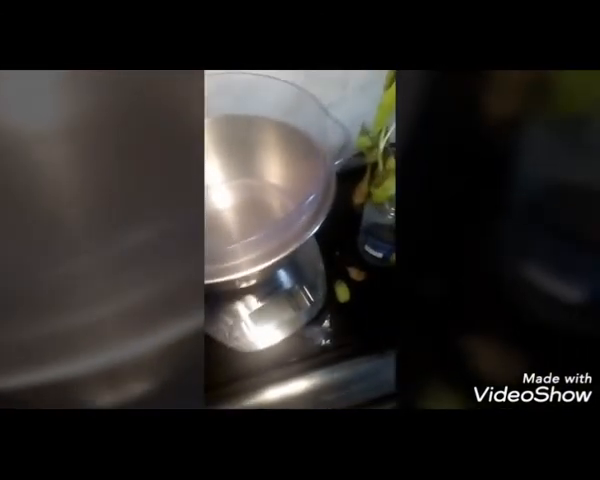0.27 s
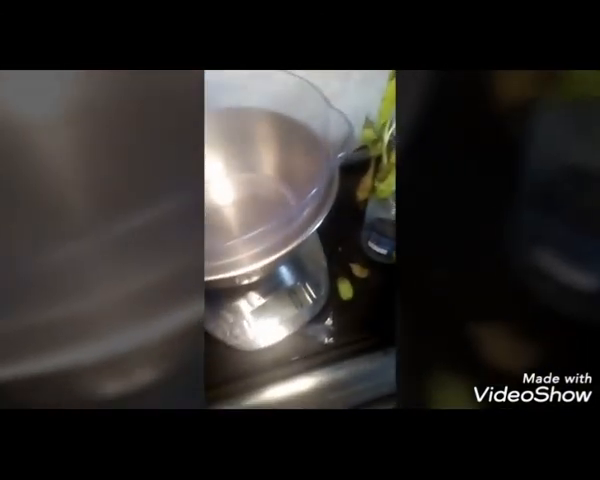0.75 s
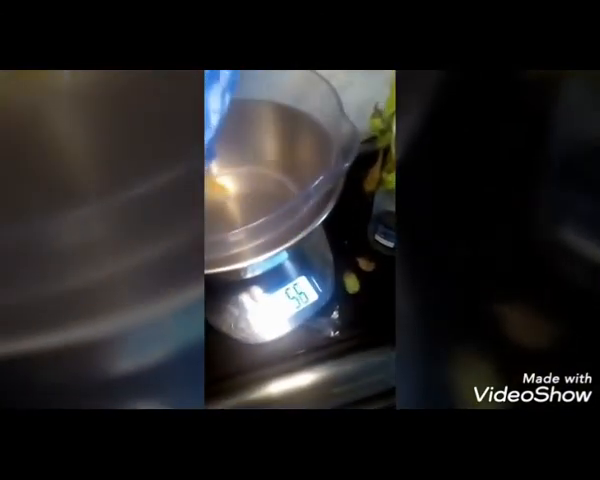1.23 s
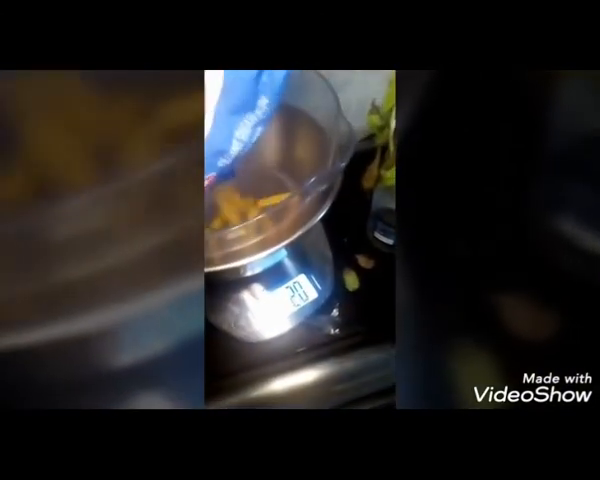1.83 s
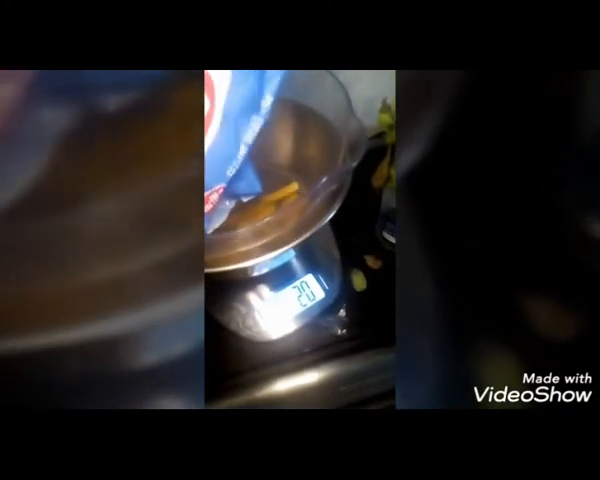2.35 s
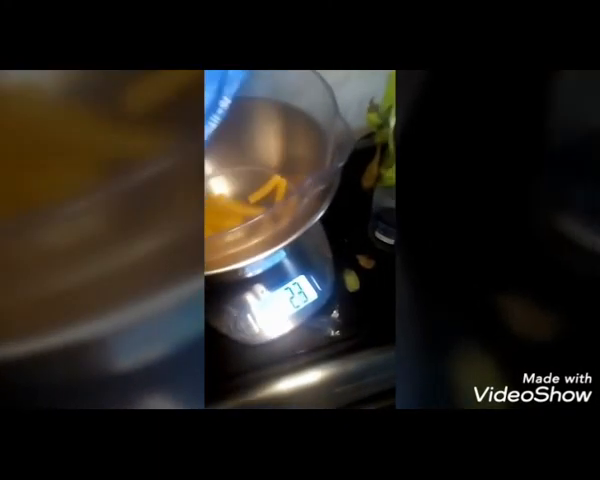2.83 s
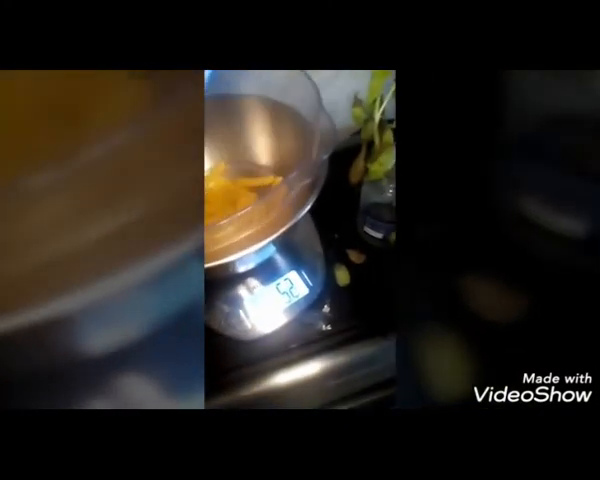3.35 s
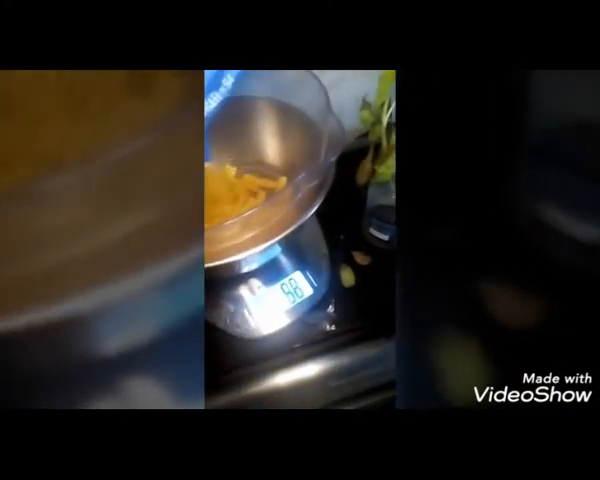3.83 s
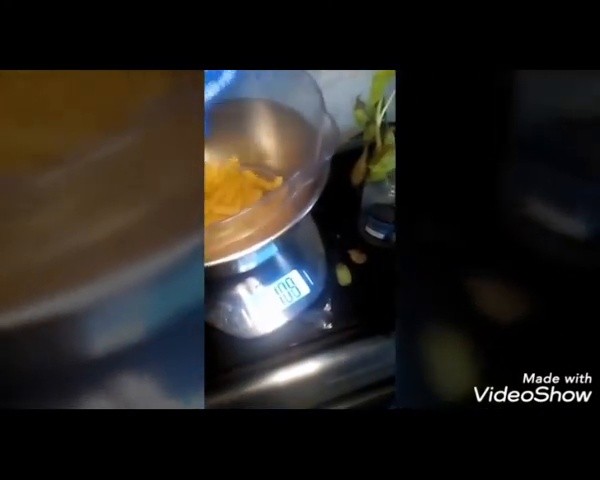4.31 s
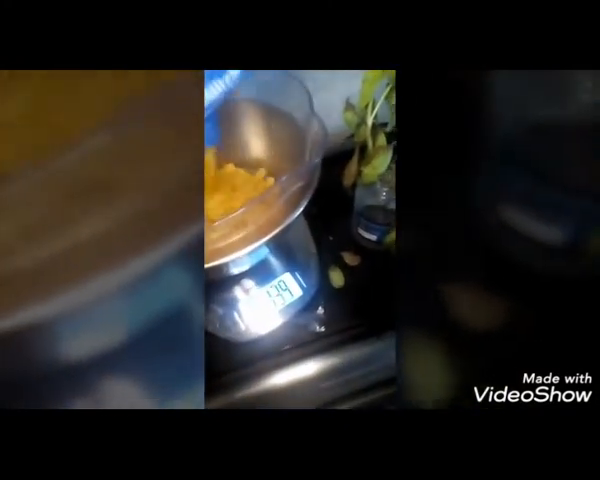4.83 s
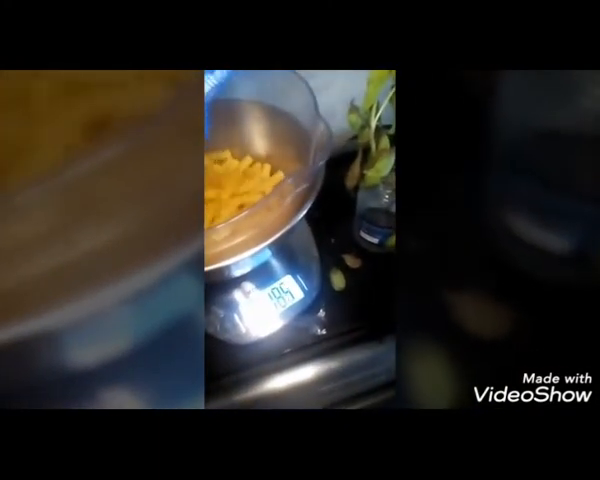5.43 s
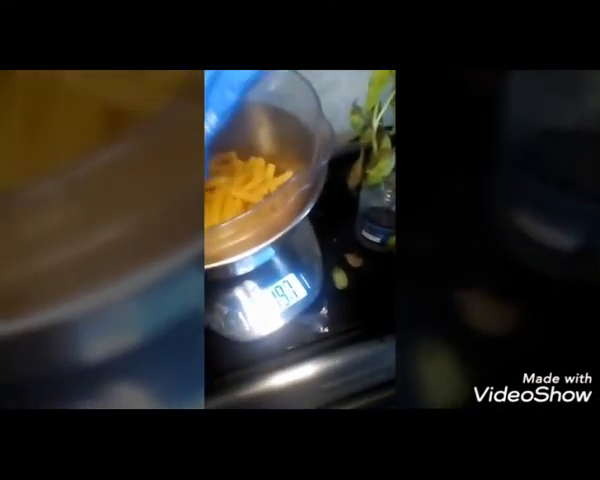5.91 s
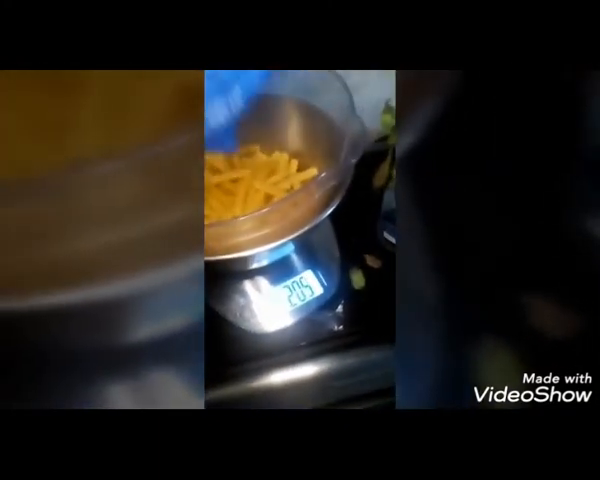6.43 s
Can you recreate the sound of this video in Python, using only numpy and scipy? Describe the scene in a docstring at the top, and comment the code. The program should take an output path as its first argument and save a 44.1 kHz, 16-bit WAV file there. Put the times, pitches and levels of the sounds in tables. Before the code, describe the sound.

Bag film snaps and crinkles quietly, then hard hollow tubes tumble into a thin metal bowl close to the microphone, skidding and clacking in clumps. The bright short steel ring gives way to drier tube-on-tube rattling with a dull knock beneath. After a near-quiet pause marked by one hard knock and some crinkling, a final clump lands. Light room reflections, faint low hush.

```python
"""Dry pasta tubes pour from a plastic bag into a steel bowl, in surges of heavy clumps and single tubes.
Clumps are bursts of tiny contacts, single tubes are skidding clacks, and some blows set off one clear note.
The clatter drives the bowl: its steel wall and base ring, and a duller knock comes in as the heap grows.
The bag crackles first, with noise bursts for snapping creases; after a pause, opened by the sharp knock
of a stray tube, a second pour begins. Kitchen reflections and a faint hush lie behind it all."""
import sys
import numpy as np
from scipy import signal
from scipy.io import wavfile
from scipy.ndimage import uniform_filter1d, minimum_filter1d

SR = 44100
rng = np.random.default_rng(int(sys.argv[2]) if len(sys.argv) > 2 else 0)


def inscribe(sig):
    """Save sig as 16-bit PCM at rate SR to the path in sys.argv[1].

    A 1-D sig is mono; a 2-D sig holds one channel per row.
    Samples are clipped to [-1, 1] before scaling.
    """
    pcm = np.round(np.clip(np.atleast_2d(sig).T, -1, 1) * 32767)
    wavfile.write(sys.argv[1], SR, pcm.astype(np.int16))


N = 293706
TIME = np.arange(N) / SR

# heavy clumps of tubes landing: (time [s], relative level [dB], treble boost [dB], length of the burst [s])
CLUMP_LANDINGS = [(1.143,-3.5,-8.5,0.016), (1.184,2.5,1,0.0048), (1.204,-3,-1,0.0063), (1.326,0,25,0.0053),
                  (1.382,-3.5,3,0.0073), (1.427,-4,2,0.0041), (1.438,-2,4,.003), (1.449,0,4,0.008),
                  (1.474,1,1,0.0039), (1.507,-2,1,0.0094), (1.519,2,-24,0.0054), (1.56,2.5,18,0.0035),
                  (1.606,2.5,-7,0.0044), (1.644,-4,8,0.009), (1.675,-9,4,0.0054), (1.698,2,4,0.0042),
                  (1.77,0,5,0.0027), (1.794,0.5,-14,0.01), (1.813,-3.5,-4,0.016), (1.872,-2,-4,0.0038),
                  (1.925,-2,-4,0.01), (1.944,-5,15,0.0079), (1.982,-8,14,0.028), (2.008,-4.5,3,0.01),
                  (2.03,-4.5,11,.006), (2.045,-0.5,4,0.003), (2.12,-6.5,-9,0.009), (2.162,-4,0,0.006),
                  (2.167,-14,-2,0.025), (2.252,-0.5,-5.5,0.0052), (2.288,-3,15,0.0088),
                  (2.335,-7.5,-1,0.012), (2.366,-9,-5,0.0058), (2.404,-4.5,10,0.013),
                  (2.429,-2.5,12,0.0031), (2.449,-7,-2,0.014), (2.466,-4.5,-1,0.0071),
                  (2.554,-1.5,-3,0.0029), (2.5864,6.5,-1,0.0046), (2.603,-4,-10,0.0066),
                  (2.669,-2.5,0,0.027), (2.701,0,-2.5,.004), (2.712,1,-6,0.0028), (2.724,-5,-3,0.006),
                  (2.767,-4.5,9,0.037), (2.805,-0.5,2.5,0.017), (2.847,-3,11,0.0059), (2.859,1,-9.5,0.017),
                  (2.903,1,-9,0.0075), (2.935,0,-8,0.0081), (2.948,-1.5,-3,0.024), (2.973,2,0.5,0.008),
                  (2.989,-3.5,8,0.021), (3.007,1,20,0.0066), (3.04,0,3,0.0048), (3.061,-4.5,-5,0.005),
                  (3.117,-3.5,3,0.015), (3.182,-9,13,0.025), (3.236,-4.5,-2,0.028), (3.261,-6,7,0.036),
                  (3.292,-5.5,3,0.0079), (3.333,-3,16,0.002), (3.355,-13,4,.004), (3.409,-7,-6,0.06),
                  (3.477,-3,-3,0.011), (3.496,-0.5,10.5,0.0066), (3.591,-2.5,-5,0.0042),
                  (3.65,-3.5,1,0.0088), (3.672,-4.5,8.5,0.0064), (3.695,0.5,6,0.0053),
                  (3.749,-4.5,14,0.006), (3.766,-3,5.5,0.0088), (3.784,-6,10,0.0092), (3.823,0,-16,0.0067),
                  (3.862,-5,7,0.0038), (3.976,-5.5,1,0.061), (4.022,-15,4,0.011), (4.128,-5.5,-7,0.02),
                  (4.151,-3.5,-9,0.0034), (4.238,-7,-10,0.013), (4.273,-1.5,-7,0.0033), (4.309,-6,-1,0.018),
                  (4.361,-9.5,-3,0.021), (4.376,-5.5,-3,.005), (4.388,-5.5,12,0.0091), (4.432,-10,1,0.015),
                  (4.496,-17,1,0.0041), (4.554,-6.5,-2,0.0065), (4.584,-7,2,0.0062), (4.641,-4,3,0.014),
                  (4.659,-4.5,6,0.012), (4.679,-2,6,0.0024), (4.715,-5.5,19,0.011), (4.726,-4,4,0.0055),
                  (4.776,-2.5,8,0.015), (4.795,-10,5,0.003), (4.867,-5,-5,0.0059), (4.907,0,-1,0.0035),
                  (4.962,-5.5,5,0.018), (5.035,2,-1,0.014), (5.07,-5.5,9,0.018), (5.115,-0.5,9,0.004),
                  (5.164,-5,-7,.004), (5.219,-4,-9,0.0051), (5.246,-6.5,-3,0.0047), (5.27,-7,5,0.0035),
                  (5.301,-8,17,0.0044), (5.335,-16,-8,0.0045), (5.39,-7,-15,0.023), (5.425,-8,0,0.015),
                  (5.468,-4,-12,0.0076), (5.509,-8,4,0.012), (5.524,-4.5,-3,0.0067), (5.549,-6.5,3,0.018),
                  (5.584,-4,-6,0.0056), (5.602,-12,2,0.0091), (5.641,-2.5,-1,0.0053),
                  (5.668,-6.5,14,0.0056), (5.686,-12,-10,0.013), (5.709,-13.5,-4,0.0093),
                  (5.74,-3,-3,0.0074), (5.79,-6.5,0,0.01), (6.076,-17.5,-17,0.0075), (6.5669,-6,1,0.025),
                  (6.589,-10,4,0.022)]
# single tubes striking end-on, each setting off one clear note of the steel or of the tube:
# (time [s], level [dB], pitch [Hz], cycles until the ring falls to about a third [count])
CLEAR_NOTES = [(1.186,-19,5140,18), (1.327,1.5,4200,23), (1.451,-1,4790,35), (1.608,3,2530,20),
               (1.699,-1.5,4970,30), (1.895,-7.5,1990,47), (1.988,4,5100,36), (2.262,-10,1490,17),
               (5.977,-12,2190,6.1), (5.984,-26,2430,16), (6.076,-9,2720,7), (6.086,-21,2820,12)]
# surges of tubes sliding out as the bag is tipped: (time of the crest [s], level [dB], swell [s], ebb [s])
POUR_SURGES = [(1.27, -21, 0.054, 0.019), (1.62, -3, 0.049, 0.039), (2.15, -9, 0.42, 0.19),
               (2.74, -6, 0.051, 0.37), (3.201, -2, 0.27, 0.19), (3.98, -2, 0.21, 0.12),
               (4.85, -6, 0.36, 0.42), (5.179, -3, 0.068, 0.097), (5.797, -14, 0.23, 0.038),
               (6.589, -10, 0.015, 0.036)]
# what the tubes fall on, all levels relative: (time [s], ring of the steel wall [dB], boom of its base [dB],
# dull knock of the heap [dB], clack of tube on tube [dB], share of the bare steel's ring time [ratio])
BOWL_FILL = [(1.14,-4.5,-23.5,-32,-5,1.34), (1.9,-1.5,-17.5,-17.5,-1.5,1.38),
             (2.298,-3.5,-21.5,-11,-0.5,1.3), (2.6,-7,-32,-34,0,0.9), (3.1,-4,-22.5,-7,-2.5,1.7),
             (3.951,-7.5,-15.5,-3,-0.5,1), (4.3,-5,-21,0,-1.5,0.67), (4.8,-6.5,-21.5,-1.5,-1,0.6),
             (5.7,-12,-21,0,0,0.42), (6.05,-9.5,-21,-0.5,-0.5,0.73), (6.6,-3.5,-22,3,-1,.5)]
# notes the steel bowl can ring at: (pitch [Hz], relative level [dB], time to fall by 60 dB when bare [s])
BOWL_MODES = [(558,-7,.032), (600,-9,.028), (735,-21,.05), (1040,-17,.05), (1712,-5,.036),
              (1800,-10.5,.025), (2002,-8.5,.06), (2395,-7,.04), (2450,-4.5,.04), (2560,-5.5,.04),
              (2885,-9,.035), (3005,-5,.04), (3440,-7,.022), (4015,-8,.035), (4215,-4.5,.04), (4690,-6,.03),
              (4930,0.5,.035), (5240,-7.5,.035), (5970,-12,.035)]
# creases of the bag snapping, and at 5.977 s the sharp knock of a stray tube:
# (time [s], peak level [dB], treble boost [dB], bass boost [dB])
SNAPS_AND_KNOCK = [(.0061, -14, 13, -1.5), (0.0552, -12.5, -3, 0), (0.0731, -10, 8, -5),
                   (0.0994, -15, -2, 6), (.112, -24, 15, -3), (.17, -16.5, 3, 2), (0.182, -15, -3, -11),
                   (0.222, -7, 3, -18), (0.2767, -16.5, 12, -12), (0.557, -15.5, 0.5, -4.5),
                   (0.5837, -14.5, 4, -0.5), (0.6147, -10, 11, 0), (.641, -18.5, 8, -3),
                   (.674, -19.5, 3.5, -3), (.805, -22, 2, -4), (0.825, -18.5, 12, -5),
                   (0.8539, -14.5, 2.5, 3.5), (0.8808, -13.5, -19.5, 1.5), (0.899, -14, 5, -11),
                   (1.002, -9.5, 2.5, -8), (1.024, -15.5, -4, -1), (1.0532, -15, 0, 1),
                   (1.0815, -13.5, 0, -7), (1.124, -21, 15, -1), (5.977, -2, 6, -7), (6.314, -16, 4.5, -1),
                   (6.39, -17, 4, -4), (6.3987, -11.5, 6.5, -7), (6.419, -19, -2, 3), (6.47, -16, 0, -1)]
# hands gripping and flexing the bag: (time [s], length [s], crinkle level [dB], dull flexing level [dB])
HAND_GRIPS = [(0, 0.17, -34.5, -50), (0.17, 0.067, -37, -39), (0.313, 0.099, -39.5, -49),
              (0.628, 0.14, -38, -55), (0.792, 0.14, -32, -46), (1.009, 0.042, -24, -38),
              (1.234, 0.064, -16, -26), (2.043, 0.76, -18.5, -36.5), (2.488, 0.096, -36, -33),
              (6.354, 0.039, -33, -54), (6.477, 0.23, -28.5, -41)]
# soft bumps of the bag against hand and bowl:
# (time [s], level [dB], pitch [Hz], cycles until the ring falls to about a third [count])
BAG_BUMPS = [(.213,-23.5,92,1.2), (.214,-17,864,2.5), (.881,-17,250,1.25), (1.04,-13.5,483,1.6),
             (1.295,-20,220,1.5)]
# how long the kitchen's echo lasts: (frequency [Hz], time to fall by 60 dB [s])
KITCHEN_ECHO = [(200, 0.51), (1500, 0.79), (7000, 0.091)]
# colour of tubes clacking: (frequency [Hz], relative level [dB])
TUBE_COLOUR = [(60, -60), (150, -22.5), (400, -19), (900, -18), (1500, -9), (1750, -7), (2700, 1),
               (3350, 1.5), (4400, -1), (5100, 2), (5650, -7), (6550, -7.5), (7500, -17.5), (9000, -36),
               (14000, -90)]
# colour of the knock through the heap: (frequency [Hz], relative level [dB])
HEAP_COLOUR = [(80, -40), (300, -5.5), (550, -1), (660, -3), (780, 2.5), (1000, -1), (1450, 5.5), (2200, 0),
               (4000, -12.5), (10000, -57)]
# colour of the crackling plastic film, also lent to the stray knock: (frequency [Hz], relative level [dB])
FILM_COLOUR = [(60, -17.5), (250, -0.5), (900, 2.5), (2400, 6), (3500, -2), (5500, -3), (6600, -10.5),
               (7600, -27), (9500, -46), (15000, -59.5)]
# colour of the film flexing dully: (frequency [Hz], relative level [dB])
FLEX_COLOUR = [(25, -35.5), (70, -7), (120, -3.5), (250, 2.5), (500, -5), (6000, -76.5)]
# colour of the background hush: (frequency [Hz], relative level [dB])
HUSH_COLOUR = [(25, -20), (70, -8.5), (140, 4.5), (300, -7.5), (700, -14.5), (2500, -22.5), (6500, -39),
               (9000, -76.5)]

POUR_START_S, POUR_END_S = 1.15, 5.741  # the first pour
TRICKLE_DB, SETTLE_DB_PER_S = -10, 93  # tubes trickle between surges, and come to rest after the pour
JAM_DEPTH, JAM_S = .8, .014  # share of the stream held back just before a clump drops, and for how long
SKID_S = .005  # how long a bouncing tube skids
BASE_BELOW_HZ = 1200  # bowl notes below this belong to the base, the others to the wall
DETUNE = .002  # typical shift of a bowl note under load, as a share of its pitch
GRIP_ATTACK_S, GRIP_RELEASE_S = 0.0035, 0.029  # a grip tightens quickly and lets go more slowly
EDGE_HZ = 15500  # the finished sound has nothing much above this


def landings(after_db=-12, ring_db=-2, uneven_db=3, first_db=7):
    """A clump lands as a tight burst of contacts, then chatters as it settles."""
    out, t = np.zeros(N), np.arange(SR // 8) / SR
    for s, db, treble_db, burst_s in CLUMP_LANDINGS:
        shape = np.exp(-(t / burst_s) ** 4) + amp(after_db - 60 * t / .06)
        touching = (t == 0) | (rng.random(len(t)) < 2500 / SR)  # about 2500 contacts a second
        strength = amp(uneven_db * rng.standard_normal(len(t)))
        chatter = shape * touching * rng.choice([-1, 1], len(t)) * strength
        chatter[0] = amp(first_db)  # the leading tube strikes hardest
        ringing = convolve(chatter, tube_ring(t60=.016))
        clump = convolve(chatter + amp(ring_db) * ringing, click(TUBE_COLOUR, treble_db))
        burst_level = np.std(clump[:round(burst_s * SR)])
        add(out, s, amp(db) * clump / burst_level)
    return out


def bounces(level_db=-1, ring_db=0, spread_db=3, count=1500):
    """Single tubes bounce off each other: each a brief skidding clack with its own ring."""
    out, t = np.zeros(N), np.arange(SR // 30) / SR
    times = (np.arange(count) + 2 * rng.random(count)) * TIME[-1] / count
    loudness = np.minimum(rng.exponential(1, count), 3)
    for s, loud in zip(times, loudness):
        skid = np.exp(-t / SKID_S) * rng.standard_normal(len(t))
        skid /= np.linalg.norm(skid)
        ring = tube_ring(t60=.022, count=3)
        add(out, s, amp(spread_db * loud) * (skid + amp(ring_db) * ring))
    clacks = evened(convolve(out * jams(), click(TUBE_COLOUR)))
    return amp(level_db) * clacks * flow()


def tube_ring(t60, count=12):
    """Short ring of a few tubes: their lengths and walls set the notes, drawn here at random."""
    t = np.arange(SR // 30) / SR
    hz, phase = rng.uniform(2034, 6360, (count, 1)), rng.random((count, 1))
    notes = np.sin(2 * np.pi * (hz * t + phase)) * amp(-60 * t / t60)
    ring = notes.sum(0)
    return ring / np.linalg.norm(ring)


def jams():
    """The stream thins for a moment as a clump wedges in the bag's mouth, just before it drops."""
    passing, t = np.ones(N), np.arange(SR // 16) / SR
    for s, *_ in CLUMP_LANDINGS:
        add(passing, s - t[-1], -JAM_DEPTH * np.exp(-t[::-1] / JAM_S))
    return np.maximum(passing, 0)


def flow():
    """Strength of the stream of tubes: a trickle, with surges that swell and ebb on top."""
    after_s = np.maximum(TIME - POUR_END_S, 0)
    power = (TIME > POUR_START_S) * amp(TRICKLE_DB - SETTLE_DB_PER_S * after_s) ** 2
    for s, db, swell_s, ebb_s in POUR_SURGES:
        width_s = np.where(TIME < s, swell_s, ebb_s)
        power = power + amp(db) ** 2 * np.exp(-((TIME - s) / width_s) ** 2)
    return np.sqrt(power)


def pitched_blows(rows):
    """Each blow sets off one resonance that dies away within so many cycles."""
    out, t = np.zeros(N), np.arange(SR // 6) / SR
    for s, db, hz, cycles in rows:
        fade = np.exp(-hz * t / cycles)
        onset = 1 - np.exp(-2 * hz * t)
        add(out, s, amp(db) * np.sin(2 * np.pi * hz * t) * fade * onset)
    return out


def bowl(clatter, heap_db=-14):
    """The clatter rings the steel wall, booms in the base and thuds through the heap."""
    strength = np.sqrt(abs(uniform_filter1d(clatter ** 2, size=64)))
    force = strength * rng.standard_normal(N)  # rough force that follows the clatter's loudness
    s, wall_db, base_db, knock_db, _, ring_share = np.transpose(BOWL_FILL)
    wall_modes = [m for m in BOWL_MODES if m[0] >= BASE_BELOW_HZ]
    base_modes = [m for m in BOWL_MODES if m[0] < BASE_BELOW_HZ]
    wall_gain = amp(np.interp(TIME, s, wall_db))
    base_gain = amp(np.interp(TIME, s, base_db))
    heap_gain = amp(heap_db + np.interp(TIME, s, knock_db))
    out = convolve(force * heap_gain, click(HEAP_COLOUR))
    for stage, share in zip(np.eye(len(s)), ring_share):  # the ring crossfades from stage to stage
        striking = force * np.sqrt(np.interp(TIME, s, stage))
        out += convolve(striking * wall_gain, steel_ring(wall_modes, share))
        out += convolve(striking * base_gain, steel_ring(base_modes, share))
    return out


def steel_ring(modes, ring_share, place_db=2.0):
    """Ring of these steel notes after one blow; the place struck and the load shift each a little."""
    t = np.arange(SR // 6) / SR
    hz, db, t60 = np.transpose(modes)[:, :, None]
    louder, sharper, phase = rng.standard_normal((len(modes), 3)).T[:, :, None]
    level = amp(db + place_db * louder - 60 * t / (t60 * ring_share)) / np.sqrt(t60)
    ring = (level * np.sin(2 * np.pi * (hz * (1 + DETUNE * sharper) * t + phase))).sum(0)
    band = [.8 * hz.min(), 1.1 * hz.max()]
    ring = signal.sosfilt(signal.butter(4, band, "bandpass", fs=SR, output="sos"), ring)
    return ring / np.linalg.norm(ring)


def bag_and_stray_knock(snap_s=0.0043, flutter_db=-19, flutter_s=0.012, rustle_db=-5.5):
    """Creases snap and flutter over fine crinkle and dull flexing; a stray tube's knock is made like a snap."""
    out, t = np.zeros(N), np.arange(SR // 16) / SR
    crinkle_gain, flex_gain = grips()
    shape = np.exp(-t / snap_s) + amp(flutter_db) * np.exp(-t / flutter_s)
    for s, db, treble_db, bass_db in list(SNAPS_AND_KNOCK) + small_snaps(crinkle_gain):
        burst = convolve(shape * rng.standard_normal(len(t)), click(FILM_COLOUR, treble_db, bass_db))
        add(out, s, amp(db) * burst / abs(burst).max())
    creases = contacts(per_s=2000, spread_db=3.2)
    crinkle = evened(convolve(creases, click(FILM_COLOUR, treble_db=4.0, bass_db=-6.5)))
    flexing = evened(convolve(contacts(per_s=1600, spread_db=-4.5), click(FLEX_COLOUR)))
    return out + amp(rustle_db) * crinkle * crinkle_gain + flexing * flex_gain


def small_snaps(crinkle_gain, above_db=7, spread_db=3, colour_spread_db=3, count=190):
    """Lesser creases give way at random, louder where the bag is gripped; columns as in SNAPS_AND_KNOCK."""
    times = (np.arange(count) + rng.random(count)) * TIME[-1] / count
    chance = np.clip(rng.standard_normal((count, 3)), -2, 2)
    rows = []
    for s, (loud, treble, bass) in zip(times, chance):
        grip_db = 20 * np.log10(crinkle_gain[int(s * SR)])
        peak_db = grip_db + above_db + spread_db * loud
        rows.append((s, peak_db, colour_spread_db * treble, colour_spread_db * bass))
    return rows


def grips(crinkle_rest_db=-55, flex_rest_db=-58):
    """Gains of crinkle and flexing: each grip rises, holds, lets go; the held bag is never quite still."""
    crinkle, flex = amp(crinkle_rest_db), amp(flex_rest_db)
    for s, length_s, crinkle_db, flex_db in HAND_GRIPS:
        rise = np.clip((TIME - s) / GRIP_ATTACK_S, 0, 1)
        shape = rise * np.exp(-np.maximum(TIME - s - length_s, 0) / GRIP_RELEASE_S)
        crinkle = np.hypot(crinkle, amp(crinkle_db) * shape)
        flex = np.hypot(flex, amp(flex_db) * shape)
    return crinkle, flex


def kitchen(x, delay_s=0.00733):
    """Reflections from counter and walls: a noise tail, each band dying at its own speed."""
    taps = rng.standard_normal(SR // 2) * (np.arange(SR // 2) > delay_s * SR)
    hz, t, bands = signal.stft(taps, SR, nperseg=256)
    fade = amp(-60 * t / read(KITCHEN_ECHO, hz)[:, None])
    tail = signal.istft(bands * fade, SR, nperseg=256)[1]
    return convolve(x, tail / np.linalg.norm(tail))


def hush(level_db=-46.5):
    """Faint, steady background noise in its own colour."""
    return amp(level_db) * convolve(rng.standard_normal(N), click(HUSH_COLOUR))


def amp(db):
    """Turns decibels into a gain."""
    return 10 ** (np.asarray(db) / 20)


def evened(x):
    """Scales a sound to an average (rms) level of one."""
    return x / np.sqrt(np.mean(x ** 2) + 1e-20)


def read(points, hz):
    """Reads a curve joined by straight lines on a log-frequency axis."""
    f, value = np.transpose(points)
    return np.interp(np.log(hz + 1), np.log(f + 1), value)


def add(mix, s, sound):
    """Mixes a sound in at time s."""
    part = mix[max(round(s * SR), 0):][:len(sound)]
    part += sound[:len(part)]


def convolve(x, response):
    """Lets every sample of x set off the response, and keeps the length of x."""
    return signal.oaconvolve(x, response)[:len(x)]


def click(colour, treble_db=0, bass_db=0, size=2048):
    """A click of unit energy in this colour, with treble and bass turned up or down."""
    hz = abs(np.fft.fftfreq(size, 1 / SR))
    treble = treble_db * read([(2800, -.5), (4500, .5)], hz)
    bass = bass_db * read([(900, 1), (1800, 0)], hz)
    log_gain = np.log(amp(read(colour, hz) + treble + bass))
    spectrum = np.exp(np.conj(signal.hilbert(log_gain)))  # minimum phase: the energy comes at once
    shape = np.fft.ifft(spectrum).real[:size // 2]
    return shape / np.linalg.norm(shape)


def contacts(per_s, spread_db):
    """Tiny blows at random moments, uneven in strength."""
    size = amp(spread_db * np.minimum(rng.exponential(1, N), 4))
    struck = rng.random(N) < per_s / SR
    return evened(size * rng.choice([-1, 1], N) * struck)


def scene(tubes_db=-2, bounce_force_db=-4, room_db=-12):
    """Tubes, bowl and bag close by, the kitchen's echo and its faint hush."""
    falling, settling = landings(), bounces()
    s, *_, clack_db, _ = np.transpose(BOWL_FILL)
    clack_gain = amp(tubes_db + np.interp(TIME, s, clack_db))
    tubes = clack_gain * (falling + settling) + pitched_blows(CLEAR_NOTES)
    steel = bowl(falling + amp(bounce_force_db) * settling)  # bounces press on the bowl less than falls
    near = tubes + steel + bag_and_stray_knock() + pitched_blows(BAG_BUMPS)
    return (near + amp(room_db) * kitchen(near) + hush())[None]


def record(dry, knee_db=-21, squeeze=0.49, attack_s=0.0016, recover_db_per_s=26, ceiling_db=-1):
    """Gain control turns loud moments down and recovers slowly; a fast limiter; then the band limit."""
    hold = np.exp(-1 / (attack_s * SR))  # the level is sensed with a lag, so attacks slip through
    power_db = 10 * np.log10(signal.lfilter([1 - hold], [1, -hold], dry[0] ** 2) + 1e-12)
    fall = TIME * recover_db_per_s
    held_db = np.maximum.accumulate(power_db + fall) - fall  # jumps up, sinks at a steady rate
    over_db = np.maximum(held_db - knee_db, 0)
    ducked = dry[0] / amp(squeeze * uniform_filter1d(over_db, size=33))
    peak = -minimum_filter1d(-abs(ducked), size=65)
    gain = uniform_filter1d(np.minimum(1, amp(ceiling_db) / (peak + 1e-9)), size=65)
    low_pass = signal.firwin(511, EDGE_HZ, window=("kaiser", 9), fs=SR)
    return signal.oaconvolve(ducked * gain, low_pass, "same")[None]


dry = scene()
out = record(dry)
inscribe(out)
```